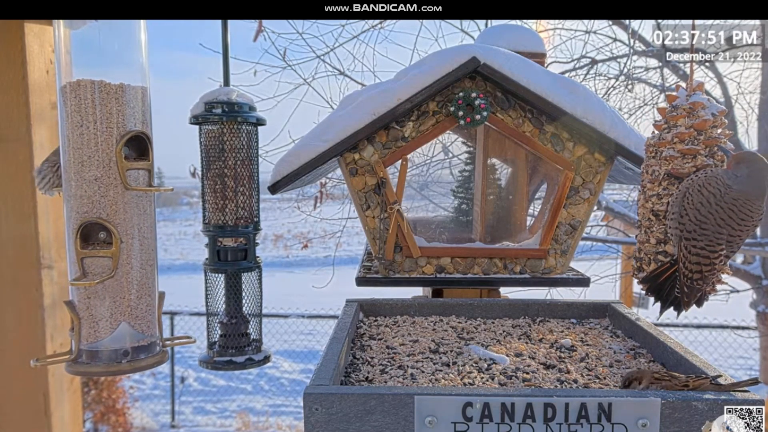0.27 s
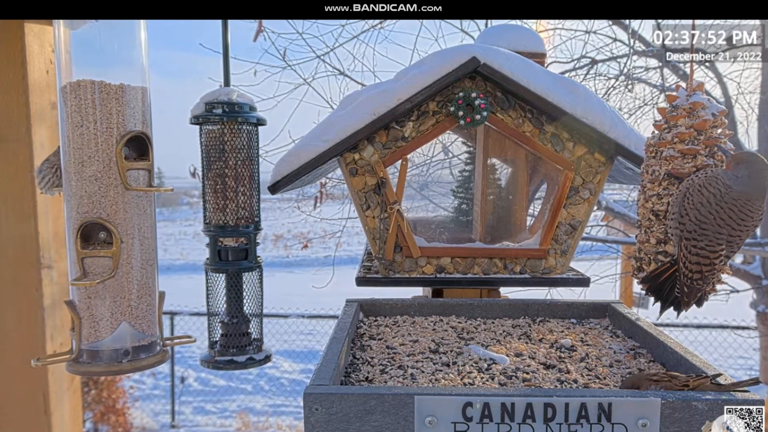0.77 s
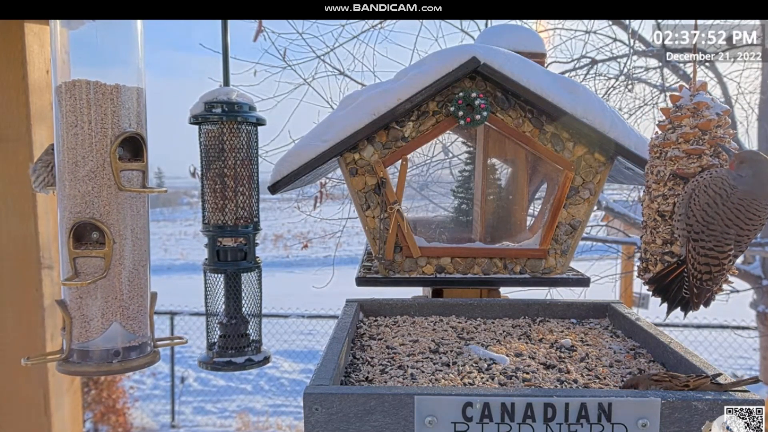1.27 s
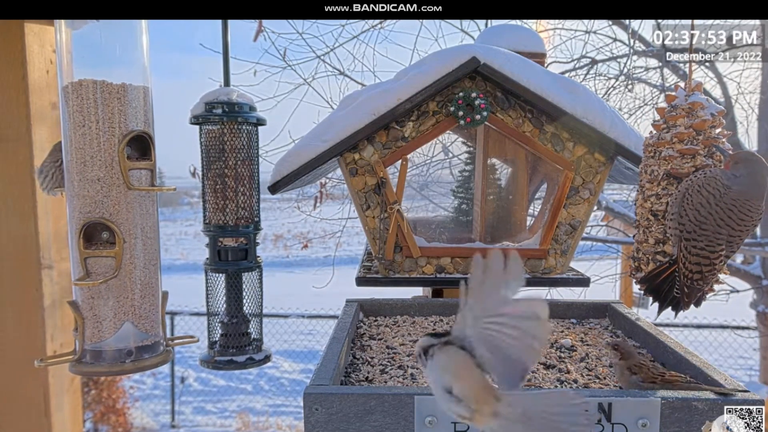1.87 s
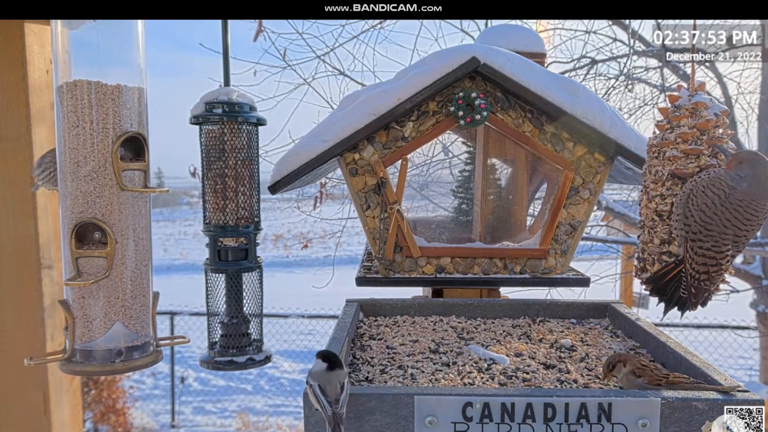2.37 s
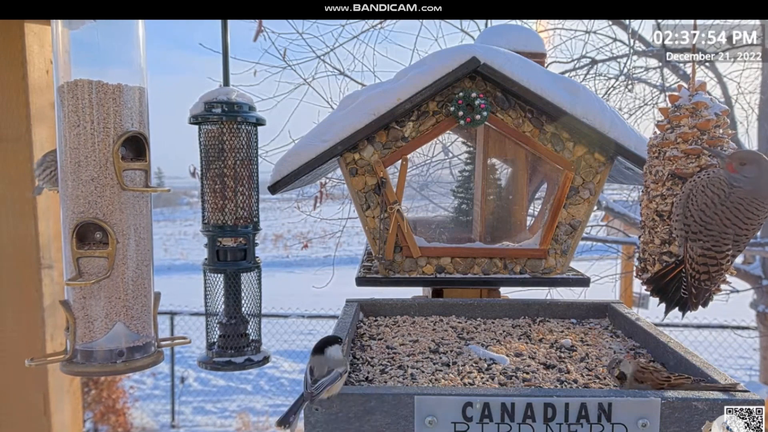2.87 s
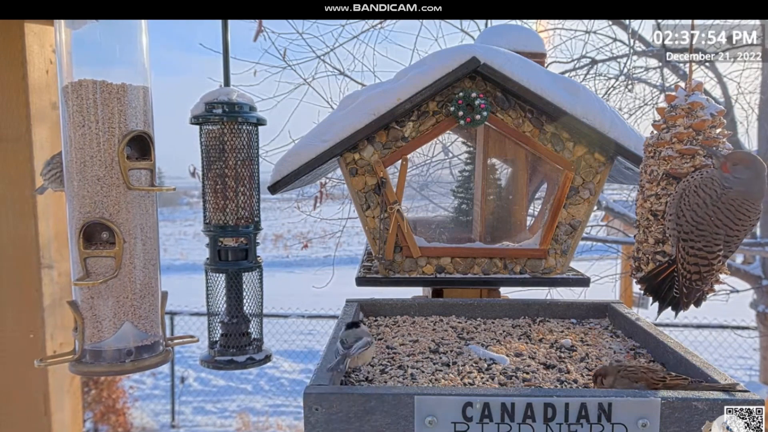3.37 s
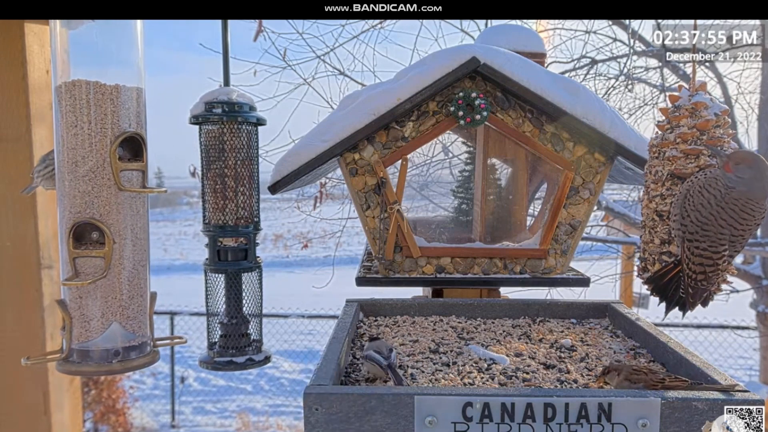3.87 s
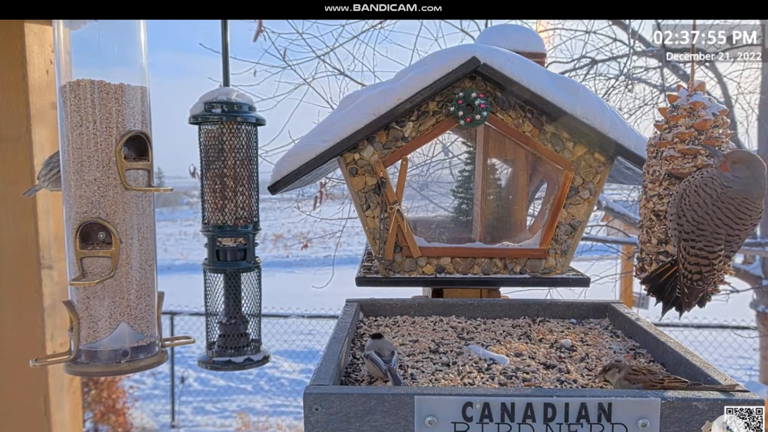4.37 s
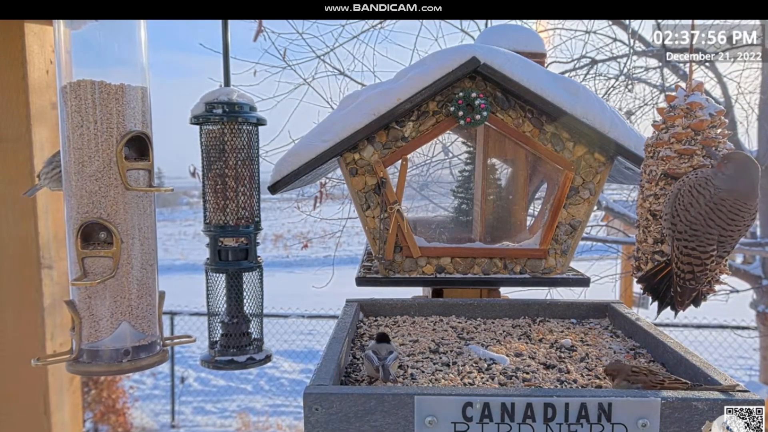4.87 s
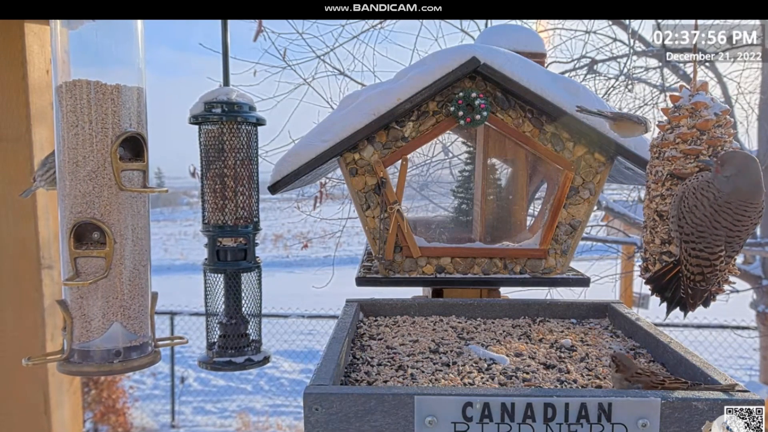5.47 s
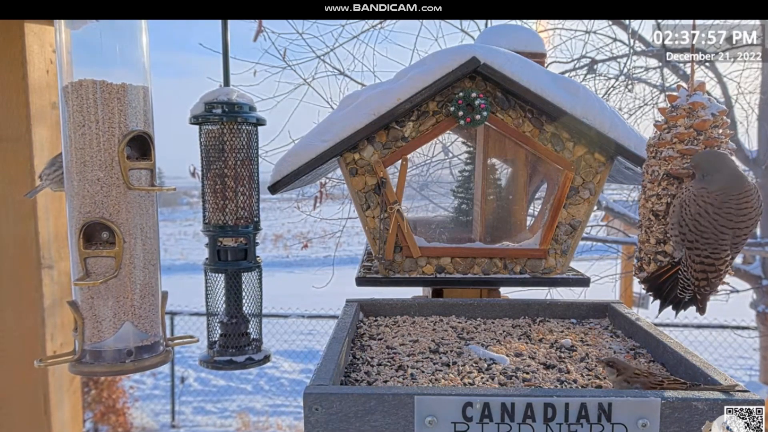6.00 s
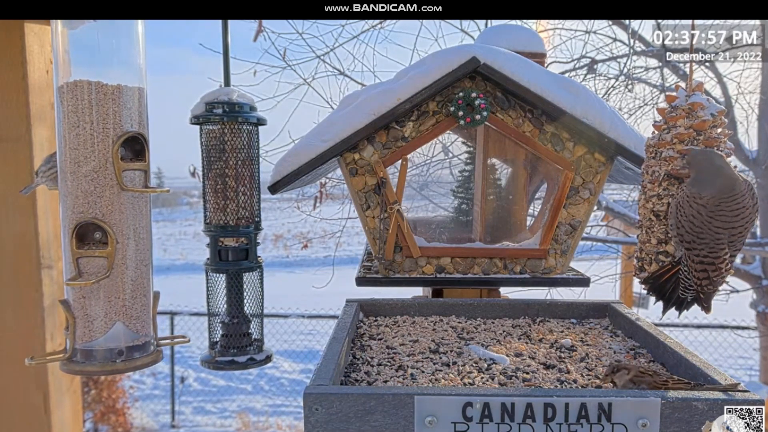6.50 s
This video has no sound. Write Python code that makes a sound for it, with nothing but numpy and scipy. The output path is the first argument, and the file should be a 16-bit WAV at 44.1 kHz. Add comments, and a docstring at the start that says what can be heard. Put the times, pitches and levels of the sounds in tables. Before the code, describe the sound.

At an outdoor feeder, heard from close by, soft wingbeats and small clicks lead to a single piercing chirp, which drops out for an instant. The birds go on feeding with irregular ticks, husk rustles and a light metallic ping. Another flutter is followed by a run of sharper pecks on the wooden tray and cracking seed shells. Distant traffic rumbles faintly throughout, with a few thin, far-off peeps.

```python
"""A wooden seed tray in a snowy yard, the microphone close by; far traffic and a low hum lie behind.
Small birds flutter in the first second, beaks and claws ticking on seed. At 1.3 s one gives a sharp
chip, and midway through it the sound cuts out for an instant. Feeding picks up: feet rake the husks,
a metal perch pings, farther birds peep. Wings buffet the microphone again near 4.1 s; then, from 4.5
to 5.8 s, hard pecks knock the tray and shells snap. Light ticking carries on to the end."""
import sys
import numpy as np
from scipy import signal
from scipy.fft import rfft, irfft
from scipy.io import wavfile
from scipy.ndimage import uniform_filter1d

SR = 44100
rng = np.random.default_rng(int(sys.argv[2]) if len(sys.argv) > 2 else 0)


def inscribe(sig):
    """Save sig as 16-bit PCM at rate SR to the path in sys.argv[1].

    A 1-D sig is mono; a 2-D sig holds one channel per row.
    Samples are clipped to [-1, 1] before scaling.
    """
    pcm = np.round(np.clip(np.atleast_2d(sig).T, -1, 1) * 32767)
    wavfile.write(sys.argv[1], SR, pcm.astype(np.int16))


N = 297234
TIME = np.arange(N) / SR
TOP_HZ = 16100


def amp(db):
    """Decibels to gain."""
    return 10 ** (np.asarray(db) / 20)


def unit(x):
    """Scales to rms 1."""
    return x / np.sqrt(np.mean(x ** 2) + 1e-20)


def seconds(length):
    """A time axis."""
    return np.arange(int(length * SR)) / SR


def spectrum_db(points, hz):
    """Reads a spectrum on a log-frequency axis."""
    f, db = np.transpose(points)
    return np.interp(np.log(hz + 1), np.log(f), db)


def add(mix, s, sound):
    """Mixes a sound in at time s."""
    part = mix[max(round(s * SR), 0):][:len(sound)]
    part += sound[:len(part)]


def filtered(x, order, hz, kind):
    """A low, high or band pass."""
    return signal.sosfilt(signal.butter(order, hz, kind, fs=SR, output="sos"), x)


def colour(x, points):
    """Gives x a spectrum, at rms 1."""
    return unit(irfft(rfft(x) * amp(spectrum_db(points, np.fft.rfftfreq(N, 1 / SR))), N))


def drift(rate_hz):
    """Random wander of rms 1, up to about the given rate."""
    hz = np.fft.rfftfreq(N, 1 / SR)
    return unit(irfft(rfft(rng.standard_normal(N)) * np.exp(-(hz / rate_hz) ** 2), N))


def swell(length, rise):
    """An envelope that rises quickly and sinks slowly."""
    u = seconds(length) / length
    return np.minimum(u / rise, 1) * np.sqrt(1 - u)


def causal(db):
    """The sharp-fronted impulse response of a gain curve."""
    log_gain = np.log(amp(np.r_[db, db[-2:0:-1]]))
    return np.fft.ifft(np.exp(np.conj(signal.hilbert(log_gain)))).real


def echoes(x, delay, t60):
    """Scattered reflections of energy 1 that begin after a delay."""
    t = seconds(.5)
    taps = rng.standard_normal(len(t)) * (rng.random(len(t)) < .1) * (t > delay) * amp(-60 * t / t60)
    return signal.oaconvolve(x, taps / np.linalg.norm(taps))[:N]


def ring(blows, modes, vary_db, rise_s=0.00048):
    """Blows ring an object's modes, a little differently at each spot."""
    out, t = np.zeros(N), seconds(.5)
    for s, db in blows:
        spot_db = vary_db * rng.standard_normal(len(modes))
        ringing = sum(amp(db + mode_db + offset_db - 60 * t / t60) * np.sin(2 * np.pi * hz * t)
                      for (hz, mode_db, t60), offset_db in zip(modes, spot_db))
        add(out, s, (1 - np.exp(-t / rise_s)) * ringing)
    return out


# far traffic and open air: (frequency [Hz], relative density [dB])
TRAFFIC_SPECTRUM = [(15, -7), (35, 2.5), (52, -7), (80, -16.5), (125, -15.5), (180, -25), (300, -27),
                    (700, -26.5), (1250, -31), (2200, -44.5), (4000, -50.5), (7500, -49), (11000, -54),
                    (16000, -63)]
def traffic(db=-58.5, swing_db=0.4):
    """Traffic far beyond the yard blurs into a nearly steady rumble."""
    return amp(db + swing_db * drift(4.04)) * colour(rng.standard_normal(N), TRAFFIC_SPECTRUM)


# tones of far machinery: (frequency [Hz], level [dB], waver [Hz])
HUM_TONES = [(98.7, -65.5, 1.3), (753, -84.5, 9.5), (972, -83.5, 9.3), (1114, -83, 2.5),
             (1250, -83.5, 13.84)]
def hum(swing_db=2.0):
    """Machinery hums in the distance, each tone wavering in level and pitch."""
    out = np.zeros(N)
    for hz, db, waver in HUM_TONES:
        level = np.sqrt(2) * amp(db + swing_db * drift(4.7))
        out += level * np.sin(2 * np.pi * np.cumsum(hz + waver * drift(11)) / SR)
    return out


# wind at the microphone: (time [s], level [dB])
GUST_CURVE = [(0, -72), (3.13, -69), (3.22, -48), (3.33, -47), (3.45, -62), (6.74, -77)]
def breeze():
    """Light wind rumbles on the microphone, with one soft gust."""
    return amp(np.interp(TIME, *np.transpose(GUST_CURVE))) * unit(filtered(drift(32), 2, 22, "high"))


# calls from farther off: (time [s], length [s], start pitch [Hz], end pitch [Hz], level [dB])
FAR_CALLS = [(3.29, 0.033, 6900, 7600, -83), (3.501, 0.046, 6660, 7900, -72),
             (3.63, 0.064, 6790, 6780, -84), (6.244, 0.072, 4980, 4790, -81)]
def peeps(waver=0.028):
    """Birds away from the tray give thin, gliding whistles."""
    out, wobble = np.zeros(N), 1 + waver * drift(250)
    for s, length, start_hz, end_hz, db in FAR_CALLS:
        hz = np.linspace(start_hz, end_hz, int(length * SR))
        phase = 2 * np.pi * np.cumsum(hz * wobble[int(s * SR):][:len(hz)]) / SR
        add(out, s, np.sqrt(2) * amp(db) * signal.windows.tukey(len(hz), .7) * np.sin(phase))
    return out


# flurries at the tray: (time [s], beats [count], beat length [s], swish [dB], air push [dB])
WING_BEATS = [(0.252, 2, 0.043, -68.5, -53), (0.391, 2, 0.032, -68, -50.5), (0.467, 5, 0.034, -61.5, -68),
              (0.676, 3, 0.044, -60.5, -40.5), (0.852, 2, 0.042, -61, -39), (0.962, 1, 0.042, -62.5, -46),
              (2.109, 1, 0.069, -65, -55), (4.086, 4, 0.038, -58, -40.5), (4.312, 1, 0.058, -65.5, -47)]
# beats right at the microphone: (time [s], level [dB], thump [Hz])
CLOSE_BEATS = [(0.288, -59.5, 172), (0.428, -62.5, 207), (0.545, -60.5, 157), (0.712, -61, 136),
               (0.757, -58, 160), (0.898, -55, 177), (4.121, -62.5, 212), (4.165, -50.5, 335),
               (4.196, -60.5, 260), (4.205, -55.5, 237)]
# feather swish, and eddies at the microphone: (frequency [Hz], relative density [dB])
FEATHER_SPECTRUM = [(60, 17.5), (200, -7), (500, -1.5), (1200, -3.5), (2500, -7.5), (4000, -13),
                    (7000, -2.5), (10000, -7.5), (13000, -16.5), (16000, -25)]
EDDY_SPECTRUM = [(60, -22), (130, -5), (220, -3), (470, 5), (640, -4.5), (2000, -22.5)]
def wings(swish_fade_db=-0.55, push_fade_db=-2.5, snap_db=6, snap_s=0.011, buffet_s=0.0193):
    """Each beat snaps and swishes the feathers and sends out a wave of air; the closest ones thud."""
    swish, push, eddies = np.zeros((3, N))
    for start, beats, length, db, push_db in WING_BEATS:
        stroke_s = 1.08 * length  # each swish overlaps the next
        stroke = swell(stroke_s, rise=0.16) * amp(snap_db * np.exp(-seconds(stroke_s) / snap_s))
        u = seconds(length) / length
        wave = -np.sin(2 * np.pi * u) * signal.windows.tukey(len(u), .3)
        for k in range(round(beats)):  # fainter each beat as the bird moves off
            add(swish, start + k * length, amp(db + k * swish_fade_db) * stroke)
            add(push, start + k * length, amp(push_db + k * push_fade_db) * wave)
    for s, db, hz in CLOSE_BEATS:
        add(eddies, s, amp(db - 3) * swell(buffet_s, rise=0.086))
        turns = hz * (seconds(buffet_s) - buffet_s / 3)  # one quick kick of pressure inside the eddies
        add(push, s, -amp(db + 6) * np.sin(2 * np.pi * turns) * np.exp(-2 * turns ** 2))
    barbs = rng.standard_normal(N) * np.exp(0.34 * drift(760))
    rustle = amp(-1) * swish * colour(barbs, FEATHER_SPECTRUM)
    rustle += amp(-9) * echoes(rustle, delay=0.01, t60=0.27)
    return rustle + push + eddies * colour(rng.standard_normal(N), EDDY_SPECTRUM)


# feeding on the tray: (time [s], activity [0-1])
ACTIVITY = [(1.4, 0.1), (1.9, 0.38), (3.6, 0.45), (4.3, 0.05), (4.7, 0.56), (5.8, 0.78), (6.1, 0.7),
            (6.6, 0.95)]
def busy(s):
    """How busy the birds are at time s."""
    return np.interp(s, *np.transpose(ACTIVITY))


# feet raking the seed: (time [s], length [s], level [dB])
FOOT_SCUFFS = [(2.266, 0.022, -67), (2.477, 0.045, -73), (2.592, 0.029, -72), (2.886, 0.041, -76),
               (3.433, 0.041, -66.5), (3.738, 0.15, -80), (4.376, 0.054, -76), (4.696, 0.057, -71.5),
               (4.80, 0.089, -89), (4.989, 0.055, -69), (6.34, 0.029, -88), (6.617, 0.11, -91)]
# sliding husks, heard close: (frequency [Hz], gain [dB])
HUSK_SPECTRUM = [(500, -22), (2000, -5.5), (4000, -4), (7500, 0), (11000, -8), (16000, -15.5)]
def seed(grains_per_s=900, size_db=4, idle_db=-83, spill_db=-16.5, spill_s=0.069):
    """Husks slide in showers of tiny clicks under feet and after pecks, over a faint stirring."""
    stir = busy(TIME) * amp(idle_db + 3 * drift(11))
    for s, length, db in FOOT_SCUFFS:
        add(stir, s, amp(db) * swell(length, rise=0.29))
    for s, *_, knock_db in HARD_PECKS:
        add(stir, s, amp(knock_db + spill_db) * swell(spill_s, rise=0.088))
    edges, grains = np.geomspace(1200, TOP_HZ, 7), np.zeros(N)
    for band in zip(edges, edges[1:]):  # one band for each size of husk
        sizes = rng.choice([-1, 1], N) * amp(size_db * np.minimum(rng.exponential(1, N), 3))
        clicks = sizes * (rng.random(N) < grains_per_s / SR)
        grains += filtered(clicks, 2, band, "band")
    return stir * colour(grains, HUSK_SPECTRUM)


# the tone shared by ticks, nibbles and pecks: (frequency [Hz], gain [dB])
CONTACT_SPECTRUM = [(200, -18), (1000, 16), (1420, 15.5), (1850, 4), (3000, 5), (4200, -0.5), (5500, 4),
                    (7700, 6), (9200, 1.5), (11000, 1), (16000, -11.5)]
def crunch(db, centre_hz, spread, decay_ms, size=1024, lumpy=0.58, skirt_db=-30, bite=0.45):
    """One brief crunch of husk: the contact bites in over part of its decay time, then lets go."""
    age = 1000 * np.arange(size) / SR / decay_ms
    grit, lumps = rng.standard_normal((2, size))
    burst = grit * np.exp(lumpy * np.tanh(lumps)) * (1 - np.exp(-age / bite)) * np.exp(-age ** 0.93 / 2)
    hz = np.fft.rfftfreq(size, 1 / SR)
    band = np.exp(-.5 * (np.log2((hz + 1) / centre_hz) / spread) ** 2)
    tone_db = 20 * np.log10(band + amp(skirt_db)) + spectrum_db(CONTACT_SPECTRUM, hz)
    tick = signal.fftconvolve(burst, causal(tone_db)[:size // 2])
    return amp(db) * 10 * tick / np.linalg.norm(tick)  # the energy of 100 samples at this level


def nibbles(peak_per_s=22, db=-73.5, centre_hz=6800, vary_db=2, vary_octaves=0.63, slots=260):
    """Faint nibbling ticks fall at random, more often while the birds are busy."""
    out, slot_s = np.zeros(N), N / SR / slots
    for k, (when, chance, loud, high) in enumerate(rng.random((slots, 4))):
        s = (k + when) * slot_s
        hz = centre_hz * 2 ** (vary_octaves * (2 * high - 1))
        tick = crunch(db + vary_db * (2 * loud - 1), hz, spread=0.59, decay_ms=0.96)
        add(out, s, tick * (chance < peak_per_s * slot_s * busy(s)))
    return out


# light contacts on the tray: (time [s], level [dB], centre [Hz], spread [octaves])
LIGHT_TICKS = [(0.492, -57.5, 5900, 0.7), (.552, -66, 2200, 0.64), (.581, -64.5, 8550, 0.54),
               (.766, -63.5, 2590, 0.45), (0.762, -72, 4770, 1.7), (.858, -60.5, 7500, 1.2),
               (0.898, -57.5, 6000, 1.7), (.975, -67.5, 3300, 0.48), (0.991, -59, 5800, 1.2),
               (1.845, -67.5, 2880, 0.45), (1.968, -62, 2620, 0.65), (1.983, -65, 5500, 1.2),
               (2.048, -69, 7340, 1.2), (2.129, -61.5, 8000, 0.94), (2.289, -46, 10800, 0.54),
               (2.5266, -47.5, 7900, 0.83), (2.62, -64, 6900, 0.57), (2.751, -61, 7200, 1.6),
               (2.895, -62.5, 6600, 0.93), (2.952, -68, 6400, .3), (3.04, -72, 4040, .35),
               (3.103, -68.5, 6060, 0.82), (3.247, -58, 4830, 1.3), (3.27, -68, 7500, 1.1),
               (3.474, -68, 5700, 0.61), (3.491, -71, 4040, 0.44), (3.582, -61, 5360, 0.75),
               (3.807, -66, 6000, 1.4), (3.865, -70, 4480, 1.2), (4.055, -71.5, 3220, 0.4),
               (4.101, -55.5, 6660, 0.61), (4.102, -58.5, 1620, 0.24), (4.16, -64, 2800, 0.54),
               (4.173, -54, 8500, 0.26), (4.2128, -53.5, 5000, 2.4), (4.318, -67.5, 3320, 0.4),
               (4.427, -71, 3400, .6), (4.667, -64.5, 7080, 1.5), (4.832, -57, 9040, 0.74),
               (5.048, -56, 14000, 0.76), (5.079, -61, 8000, 1.1), (5.1593, -57, 6440, 0.43),
               (5.23, -67.5, 3220, 0.26), (5.2813, -59.5, 8500, 1.3), (5.315, -62.5, 7950, 0.97),
               (5.335, -54.5, 8140, 0.14), (5.4421, -51.5, 8000, 1), (5.63, -56.5, 7500, 0.82),
               (5.6467, -55, 7500, 0.75), (5.753, -65, 6100, 0.97), (5.78, -55, 4480, 0.8),
               (5.806, -62, 3500, 1.3), (6.1758, -61.5, 7500, 1.3), (6.232, -67, 5200, 0.35),
               (6.523, -65.5, 7550, 0.77), (6.602, -61, 6050, 0.51), (6.6277, -65.5, 7500, 0.66)]
def ticks():
    """Beaks, claws and wing tips tick on seed near the microphone; broader contacts last longer."""
    out = np.zeros(N)
    for s, db, centre_hz, spread in LIGHT_TICKS:
        add(out, s, crunch(db, centre_hz, spread, decay_ms=0.9 * spread ** 0.15))
    return out


# touches on the perch: (time [s], level [dB])
PERCH_TOUCHES = [(2.527, -48.5), (3.140, -64), (3.186, -65)]
# its modes: (frequency [Hz], gain [dB], t60 [s])
PERCH_MODES = [(3830, -17, 0.023), (5370, 1.5, 0.017), (7970, -0.5, 0.039), (11700, -15, .025),
               (14500, -18, .03)]
def perch():
    """A metal perch pings at a light touch."""
    return ring(PERCH_TOUCHES, PERCH_MODES, vary_db=2)


# shells breaking: (time [s], level [dB])
SHELL_SNAPS = [(5.1593, -59), (5.4424, -42), (5.6302, -52), (5.647, -56)]
# a shell's modes: (frequency [Hz], gain [dB], t60 [s])
SHELL_MODES = [(2860, -11, 0.015), (4600, -5.5, 0.011), (5400, -3, 0.0092), (6760, 1, 0.0091),
               (7810, 4.5, .012), (9250, -4, 0.0088), (10900, -11, .007)]
def shells():
    """A beak snaps a seed shell, which rings high and very briefly."""
    return ring(SHELL_SNAPS, SHELL_MODES, vary_db=2)


# blows that reach the tray: (time [s], crack [dB], centre [Hz], spread [octaves], decay [ms], knock [dB])
HARD_PECKS = [(1.878, -55.5, 1758, 1.2, 1.9, -78.5), (4.5264, -63.5, 5960, 1.5, 2.4, -70.5),
              (4.73, -41.5, 3600, 1.56, 1.23, -56.5), (5.0074, -58, 2600, 3.6, 2.5, -63.5),
              (5.4126, -52.5, 3820, 1.2, 0.87, -72), (5.587, -41, 4700, 1.01, 1.25, -60.5),
              (5.7732, -46.5, 5960, 1.23, 1.2, -61.5)]
def pecks():
    """A beak strikes hard into the seed with a broad crack."""
    out = np.zeros(N)
    for s, db, centre_hz, spread, decay_ms, _ in HARD_PECKS:
        add(out, s, crunch(db, centre_hz, spread, decay_ms))
    return out


# modes rung by each hard peck: the wooden tray's low modes, then the high, brief ring of the beak's crack:
# (frequency [Hz], gain [dB], t60 [s])
KNOCK_MODES = [(132.5, -0.5, 0.35), (161, 3.5, 0.2), (219, 1.5, 0.25), (249.7, 4, 0.26), (338, 2.5, 0.053),
               (477, -6, 0.23), (656, -3.5, .12), (700, -5.5, 0.3), (800, -9, 0.068), (1000, -1, 0.071),
               (1123, -13, 0.17), (1274, -8, 0.043), (1470, 11, 0.012), (3307, 12, 0.012), (6440, 10, .01),
               (7450, 10.5, 0.015), (9630, 4, .009)]
def tray():
    """The wood knocks under each hard peck, and the crack rings high and briefly."""
    return ring([(s, knock_db) for s, *_, knock_db in HARD_PECKS], KNOCK_MODES, vary_db=1.2)


# the near bird's call, an arch of pitch: (time [s], pitch [Hz], level [dB])
CHIP_ARCH = [(1.2958, 7250, -70), (1.2968, 7380, -43), (1.300, 7430, -37), (1.3052, 7610, -23),
             (1.316, 7960, -21.9), (1.326, 8130, -27.3), (1.358, 8150, -27.8), (1.36, 7500, -29.5),
             (1.3625, 5500, -34), (1.3645, 4750, -43.5), (1.3692, 4480, -47.5), (1.373, 4400, -68)]
def chip(octave_db=-35, hiss_db=-48, hiss_hz=(4500, 9000), full_rasp=0.42, rasp_fall_hz=2000):
    """A close, nearly pure whistle, with a faint band of hiss laid over it; it rasps as it plunges."""
    s, hz, db = np.transpose(CHIP_ARCH)
    t, out = s[0] + seconds(s[-1] - s[0]), np.zeros(N)
    pitch = uniform_filter1d(np.interp(t, s, hz), size=40)
    level_db = uniform_filter1d(np.interp(t, s, db), size=40)
    fallen_hz = np.maximum.accumulate(pitch) - pitch
    rasp = full_rasp * np.clip(fallen_hz / rasp_fall_hz, 0, 1)
    phase = 2 * np.pi * np.cumsum(pitch) / SR + .5 * rasp * drift(700)[:len(t)]
    level = amp(level_db) * (1 + .5 * rasp * drift(900)[:len(t)])
    whistle = np.sqrt(2) * (np.sin(phase) + amp(octave_db) * np.sin(2 * phase))
    hiss = unit(filtered(rng.standard_normal(len(t)), 4, hiss_hz, "band"))
    add(out, s[0], level * (whistle + (amp(hiss_db) + rasp) * hiss))
    return out


def scene():
    """At one fixed microphone: the feeders throw back quick reflections, the yard a faint longer tail."""
    taps = ticks() + pecks() + nibbles() + perch() + shells() + seed()
    taps += amp(-14) * echoes(taps, delay=.0025, t60=.0546) + amp(-31) * echoes(taps, delay=.012, t60=.18)
    call, far = chip(), peeps()
    off_feeders = amp(-17) * echoes(call, delay=.002, t60=.05)
    off_yard = amp(-36) * echoes(call, delay=.032, t60=.15) + amp(-48) * echoes(call, delay=.06, t60=.4)
    far += amp(3) * echoes(far, delay=.006, t60=.11)  # distant calls carry more echo
    near = taps + call + off_feeders + off_yard + tray() + wings()
    return (near + far + traffic() + hum() + breeze())[None]


def record(dry):
    """The sound cuts out for an instant in mid-chip, leaving a muffled trace; treble ends at TOP_HZ."""
    dropout = (TIME > 1.3263) & (TIME < 1.3526)
    muffled = amp(-22.5) * filtered(dry, 4, 1500, "low")
    band_limit = signal.firwin(401, TOP_HZ, window=("kaiser", 9), fs=SR)
    return signal.oaconvolve(np.where(dropout, muffled, dry), band_limit[None], "same")


dry = scene()
out = record(dry)
inscribe(out)
```